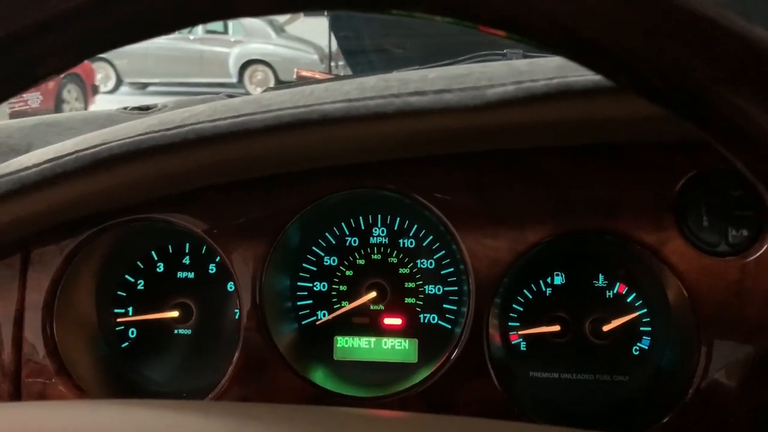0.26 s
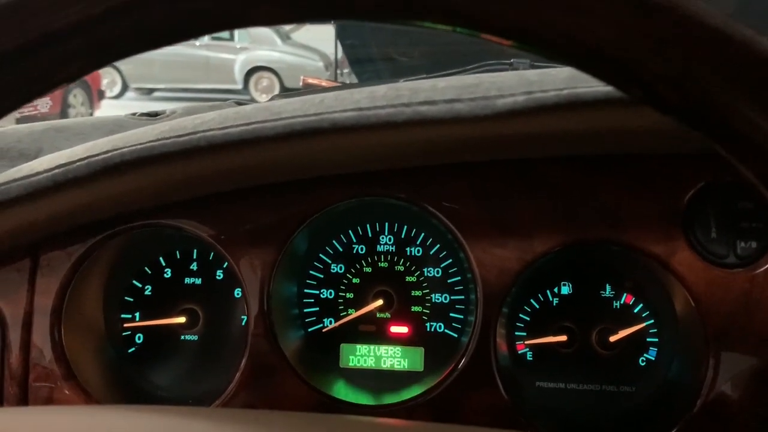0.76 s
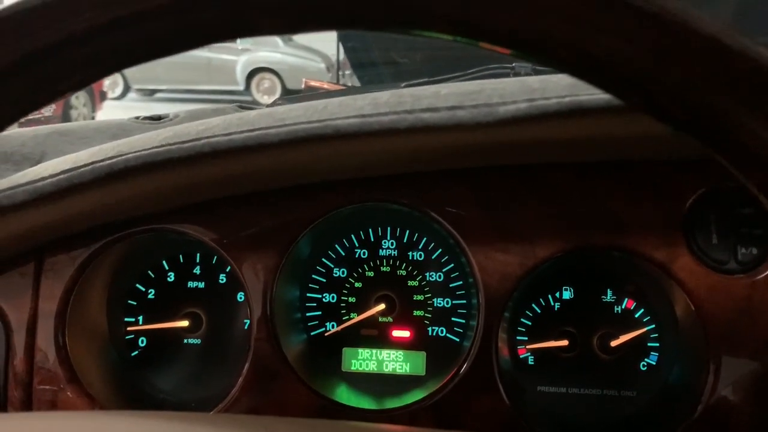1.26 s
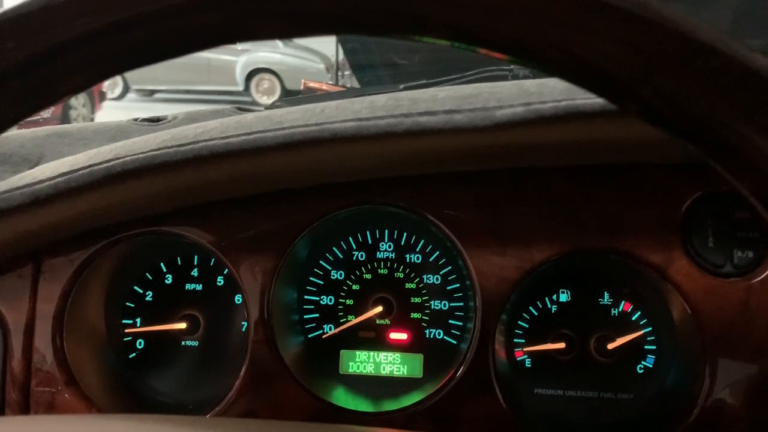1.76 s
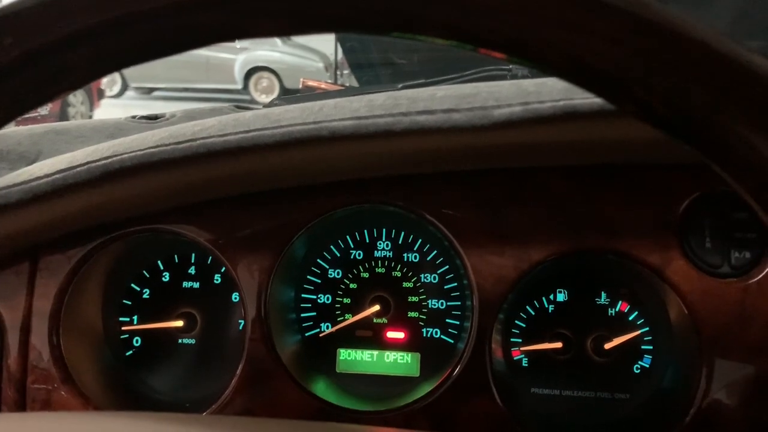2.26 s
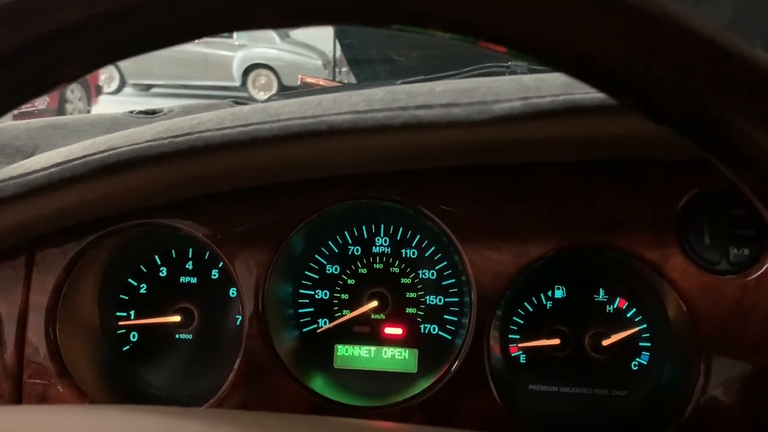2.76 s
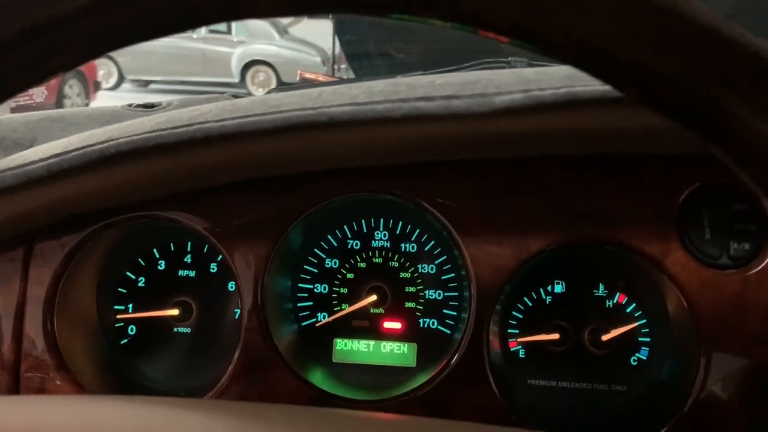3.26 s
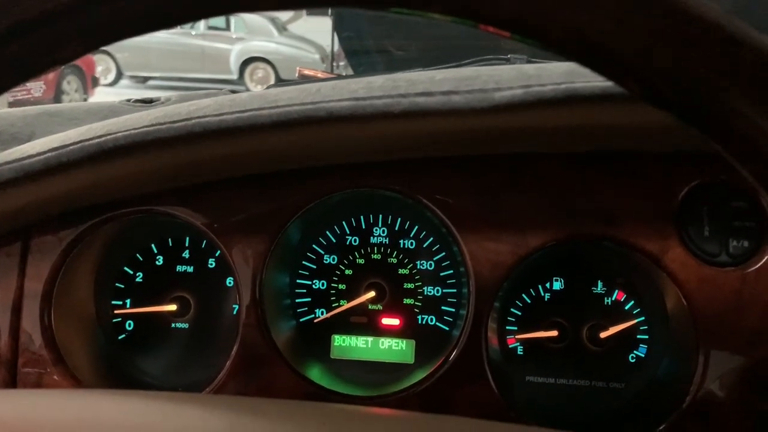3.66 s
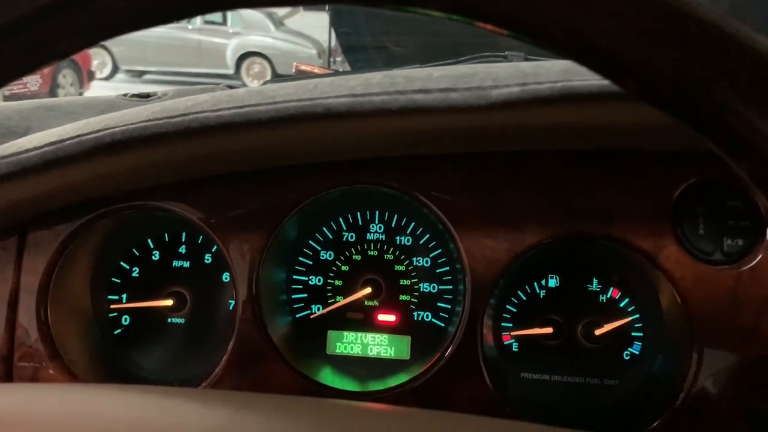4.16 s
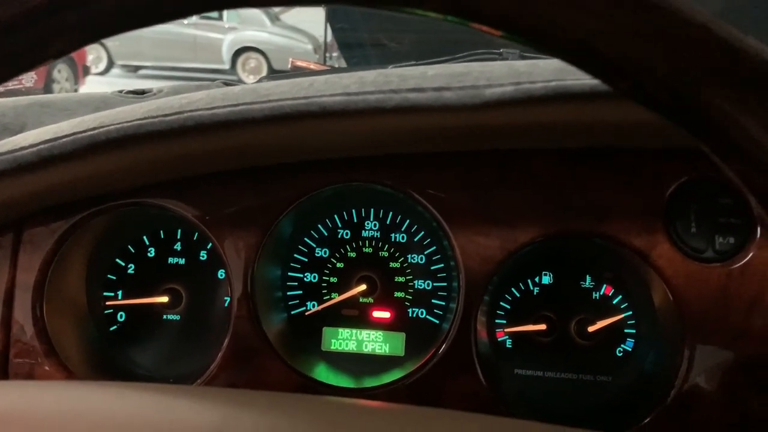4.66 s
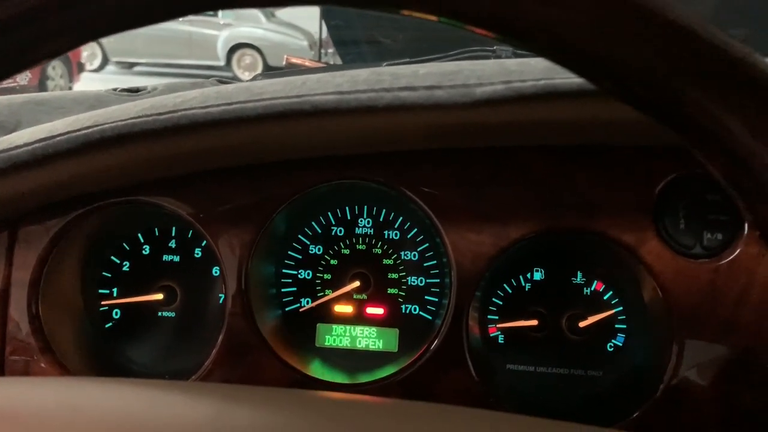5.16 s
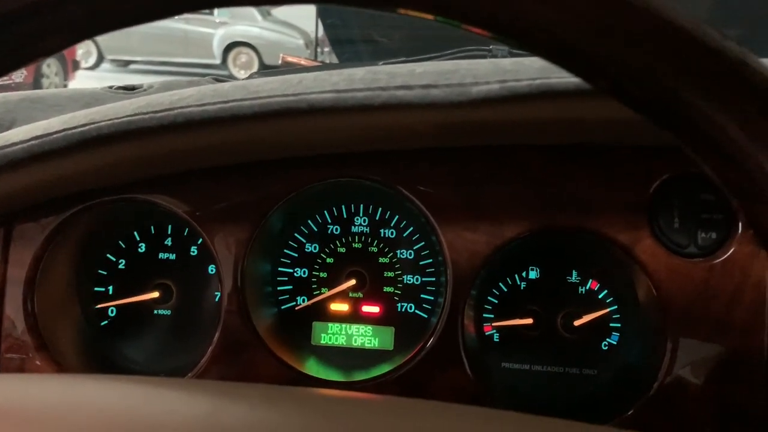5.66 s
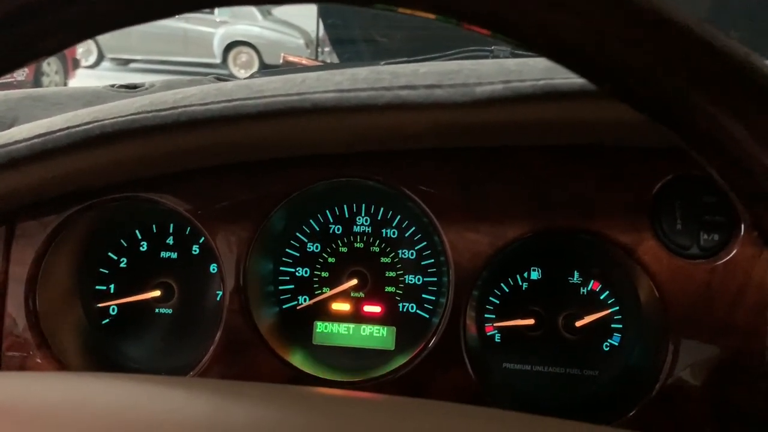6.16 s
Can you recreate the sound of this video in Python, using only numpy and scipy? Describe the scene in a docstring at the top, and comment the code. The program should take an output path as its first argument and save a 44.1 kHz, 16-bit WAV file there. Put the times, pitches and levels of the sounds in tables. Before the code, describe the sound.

From the driver's seat, a smooth booming eight-cylinder idle falls to a slowed, deeper throb, later labouring unevenly with thuds and small trim knocks.

```python
"""An eight-cylinder engine idles at its own pitch, heard from the driver's seat with door and bonnet open in a
workshop. After about a second it drops an octave, as if played at half speed; later it stumbles: its firing
rate sags, then climbs most of the way back, and the cabin boom beats with it. Boom and purr are sines locked
to the firing, rumble, engine bay, fizz and rustles are shaped noise, whines are thin tones, and knocks are
dying sines."""
import sys
import numpy as np
from scipy import signal
from scipy.fft import rfft, irfft
from scipy.io import wavfile
from scipy.ndimage import uniform_filter1d

SR = 44100
rng = np.random.default_rng(int(sys.argv[2]) if len(sys.argv) > 2 else 0)


def inscribe(sig):
    """Save sig as 16-bit PCM at rate SR to the path in sys.argv[1].

    A 1-D sig is mono; a 2-D sig holds one channel per row.
    Samples are clipped to [-1, 1] before scaling.
    """
    pcm = np.round(np.clip(np.atleast_2d(sig).T, -1, 1) * 32767)
    wavfile.write(sys.argv[1], SR, pcm.astype(np.int16))


N = 283122

# Idle at full speed: [t/s, firing rate f/Hz, base level/dB of overtone 2, of overtone 4]
FULL_SPEED_IDLE = [(.1, 42.5, -7.5, -37), (.2, 42.22, -10, -33), (.37, 43.58, -6, -36.5),
                   (.5, 43.92, -6.5, -26.5), (.68, 44.13, -11, -29.5), (.82, 43.98, -8.5, -33.5)]
# Idle and stumble at half speed: [t/s, firing rate f/Hz, firing level/dB, uneven firing level/dB]
HALF_SPEED_IDLE = [(1.15, 21.75, -8, -42.5), (1.75, 21.62, -7, -37.5), (2.05, 21.8, -7.6, -44),
                   (2.35, 21.9, -8.5, -42), (2.7, 21.72, -8, -43.5), (3.3, 21.62, -7, -41.5),
                   (3.85, 21.8, -6.5, -40), (4.2, 21.75, -7.5, -39), (4.5, 21.6, -7.5, -42),
                   (4.8, 21.65, -7, -37), (4.91, 21.5, -5.5, -18), (5.05, 16.7, -2, -7),
                   (5.13, 15.2, -6.5, -7.5), (5.155, 15.3, -5, -21), (5.21, 15.3, -2.5, -16),
                   (5.3, 14.3, -8.5, -19), (5.42, 12.3, -5.5, -16.5), (5.66, 12.5, -7.5, -19),
                   (5.76, 12.1, -8.5, -15), (5.85, 15.3, -19.5, -22), (5.97, 15, -6, -11.5),
                   (6.05, 17.1, -3, -10), (6.17, 18.1, -7.5, -4.5), (6.31, 19.2, -7.5, -4),
                   (6.4, 20, -6.5, -2.5)]
# Cross-fade from full to half speed: [start t/s, end t/s]
SPEED_CHANGE = (0.901, 1.04)
# Noise of the shaking body, at half speed: [f/Hz, relative level/dB]
RUMBLE_SHAPE = [(30, -39.5), (52, -17), (75, -16), (110, -14), (170, -19.5), (240, -19), (262, -13),
                (276, -24.5), (345, -27), (375, -34.5), (420, -33.5), (520, -38.5), (570, -47), (800, -69)]
# Noise of belts, fan and valve gear, at half speed: [f/Hz, relative level/dB per Hz]
BAY_SHAPE = [(260, -28.5), (450, -3.5), (534, -2.5), (567, -11.5), (770, -7.5), (1030, -10.5), (1200, -8.5),
             (1700, -13.5), (3530, -19.5), (4850, -19), (5690, -22.5), (6910, -23), (8300, -43),
             (10800, -73), (18300, -120)]
# Ringing parts that colour both noises, at half speed: [f/Hz, width/Hz, boost level/dB]
RINGING_PANELS = [(204, 16, 7), (330, 16, 4), (410, 16, 3.5), (752, 50, 5), (1155, 60, 3), (1700, 200, 4),
                  (2302, 40, 3), (2500, 250, 2), (2658, 30, 4), (3300, 150, 3), (3883, 40, 9),
                  (4031, 50, 7), (4285, 60, 4), (4680, 90, 4), (4788, 80, 6.5), (5240, 50, 4)]
# How alike the noise is left and right, at half speed: [f/Hz, likeness 0-1]
LEFT_RIGHT_LIKENESS = [(60, 0.89), (250, 0.96), (450, 0.6), (750, 0.7), (950, 0.95), (1500, 0.17),
                       (2500, 0.3), (3300, 0.02), (4600, 0.7), (6500, 0)]
# Noise balance, at half speed: [f/Hz, left minus right level/dB]
LEFT_RIGHT_TILT = [(60, 0.5), (180, 1.5), (550, 0.5), (1650, 2.5), (4970, -2.5), (15000, 0.5)]
# Faint top hiss: [f/Hz, relative level/dB per Hz]
FIZZ_SHAPE = [(4590, -28), (7800, -8.5), (8630, -22.5), (10500, 9.5), (12000, 2.5), (12600, -16),
              (13300, -27), (14300, -6), (15600, 0.5)]
# Short rustles: [t/s, base level/dB, fading time constant/s]
RUSTLE_EVENTS = [(1.67, -35, 0.042), (1.76, -40, 0.028), (2.8044, -48, 0.031), (2.824, -38.5, 0.025),
                 (2.85, -45, 0.026), (2.894, -41, 0.027), (2.923, -55, 0.03)]
# Colour of the rustles: [f/Hz, relative level/dB per Hz]
RUSTLE_SHAPE = [(1470, -30), (2500, 1.5), (4790, -2.5), (7020, -7.5), (8310, -23), (10300, -5.5),
                (12500, -19), (13300, -19), (15000, -11), (15600, -14)]
# Trim knocks: [t/s, base level/dB]
TRIM_KNOCKS = [(6.276, -20), (6.395, -12.5), (6.408, -11)]
# Ways the trim rings: [f/Hz, relative level/dB, time to fall 60 dB/s]
TRIM_MODES = [(515, 0, .035), (1090, -4, .028), (1380, -17, .04), (1700, -19, .026)]
# Weak lines from unequal cylinders: [multiple of the crank turns per second]
PURR_MULTIPLES = (5, 6, 7, 10, 11, 13, 14, 15, 19, 21, 24, 25, 28, 29, 30, 31, 32, 35, 37, 38, 39, 40, 41,
                  42, 43, 45, 48, 53, 57, 60, 61, 72, 76)
# One base level for each of those lines: [level/dB]
PURR_LEVELS = (-54, -46, -39, -44, -35, -46, -44, -43, -48, -48, -36, -47, -36, -44, -44, -49, -38, -44,
               -40, -38, -48, -47, -42, -45, -43, -44, -44, -55, -57, -49, -57, -57, -48)
# Main overtones: [multiple of the firing rate]
BOOM_MULTIPLES = (2, 4)
# Uneven-firing overtones: [multiple of the firing rate]
LUMP_MULTIPLES = (3, 5, 6)
# One for each of those, over the uneven firing: [level/dB]
LUMP_LEVELS = (0, -3, -2)
# How the low overtones reach the seat: [f/Hz, level/dB]
PASSAGE_TO_SEAT = [(24, -41), (29, -20), (33, -11), (37, -5.5), (43.5, 0), (50, -6), (60, -12.5),
                   (75, -15.5), (90, -17.5), (130, -22.5)]
# Overtone 4 over the firing strength: [t/s, level/dB]
OVERTONE_4_LEVEL = [(1.2, -3.5), (1.8, -3.5), (2.6, -5.5), (3.7, -9), (4.3, -8.5), (4.9, -5)]
# A short knock, then body shudders: [t/s, base level/dB, f/Hz, upper mode level/dB, cycles of f to fall 60 dB]
KNOCK_AND_SHUDDERS = [(.9556, 0, 1060, -30, 8), (5.734, 0, 225, -20, 7.5), (5.872, 13, 108, -6, 4.5),
                      (5.8985, 13.5, 90, -9, 4.2)]
# Thin steady tones, perhaps pumps and fans, at half speed: [f/Hz, base level/dB]
WHINE_TONES = [(353, -59), (366, -58), (492, -61), (525, -62), (603, -68), (658, -68), (674, -63),
               (728, -64), (758, -62), (794, -66), (841, -68), (899, -66), (986, -69), (1058, -66),
               (1156, -66)]

FAST, SLOW = 2, 1  # playing speeds, as factors on the half-speed frequencies
FIRINGS_PER_TURN = 4
LUMP_LAG = 0.32  # turns of phase by which overtones trail, per step in multiple
LEAD_S, LEAD_FROM_HZ = 0.000465, 152  # at half speed, the noise reaches the left microphone first above this
CABIN_HZ, CABIN_WIDTH_HZ = 43.3, 5  # the air in the cabin booms here
FULL_RUMBLE_DB, FULL_BAY_DB = -28.5, -41
HALF_RUMBLE_DB, HALF_BAY_DB = -29.5, -41  # before the stumble
SINK_DB_PER_OCTAVE = 3  # bay noise and fizz sink with the firing rate
FIZZ_DB = -67  # before the stumble
JUMP_S, JUMP_DB = 0.925, -2.5
EDGE_HZ = 15900  # top of the final sound


def amp(db):
    """Turn decibels into a factor."""
    return 10 ** (np.asarray(db) / 20)


def evened(x):
    """Scale to an rms of 1."""
    return x / np.sqrt(np.mean(x ** 2) + 1e-20)


def read(points, hz):
    """Read a curve between its points, on a logarithmic frequency scale."""
    f, value = np.transpose(points)
    return np.interp(np.log(hz + 1), np.log(f + 1), value)


def columns(rows):
    """Spread each column after the time over every sample."""
    s, *values = np.transpose(rows)
    return [np.interp(np.arange(N) / SR, s, v) for v in values]


def add(mix, s, sound):
    """Add a sound to the mix from second s, cut at the end."""
    part = mix[round(s * SR):][:len(sound)]
    part += sound[:len(part)]


def sides(left_db):
    """Raise the left by this many dB and lower the right by as much."""
    return amp(left_db * np.array([[1], [-1]]))


def wander(per_s):
    """Slow random drift of rms 1: twenty sines, the fastest with per_s cycles a second."""
    t = np.arange(0, N + 256, 256) / SR
    speeds = np.geomspace(per_s / 10, per_s, 20)
    slow = sum(np.sin(2 * np.pi * (f * t + rng.random())) / np.sqrt(f) for f in speeds)
    return np.interp(np.arange(N) / SR, t, evened(slow))


def shaped(spectrum):
    """Noise of rms 1 coloured by a curve."""
    hz = np.fft.rfftfreq(N, 1 / SR)
    return evened(irfft(rfft(rng.standard_normal(N)) * amp(read(spectrum, hz)), N))


def overtones(firing_hz, multiples, levels_db, uneven_db, lag=0):
    """Sines locked to the firing; uneven firing makes each waver, the pipes delay the higher ones."""
    turns = np.cumsum(firing_hz) / SR
    out = np.zeros(N)
    for k, db in zip(multiples, levels_db):
        waver_db = uneven_db * wander(12.0)
        pipe_delay = k * k / 4 + 2 * np.pi * lag * (k - BOOM_MULTIPLES[1])
        angle = 2 * np.pi * k * turns - pipe_delay + waver_db / 4  # stronger firings come earlier
        out += amp(db + waver_db) * np.sqrt(2) * np.cos(angle)
    return out


def noise(spectrum, pace, patchy_db, size):
    """Stereo noise of rms 1 ringing in the panels; pace 2 moves every frequency up an octave."""
    hop = size // 4
    frames = N // hop + 5
    hz = np.fft.rfftfreq(size, 1 / SR) / pace
    a, b, c, d, patches = rng.standard_normal((frames, len(hz), 5)).T
    # Smooth the patches over frequency, then over time
    patches = uniform_filter1d(patches, size=9, axis=0)
    patches = evened(uniform_filter1d(patches, size=5, axis=1))
    rings_db = sum(db / (1 + (2 * (hz - f) / width) ** 2) for f, width, db in RINGING_PANELS)
    # Echoes from the walls ripple the spectrum finely
    ripple = rng.standard_normal((2, len(hz)))
    echoes_db = 2.1 * evened(ripple - uniform_filter1d(ripple, size=5))[..., None]
    # The right side is partly a late copy of the left, partly its own noise
    same = np.clip(read(LEFT_RIGHT_LIKENESS, hz), 0, 1)[:, None]
    late = np.exp(-2j * np.pi * LEAD_S * np.maximum(hz - LEAD_FROM_HZ, 0))[:, None]
    left = a + 1j * b
    right = same * late * left + np.sqrt(1 - same ** 2) * (c + 1j * d)
    tilt = amp(read(LEFT_RIGHT_TILT, hz) / 2)[:, None]
    colour_db = (read(spectrum, hz) + rings_db)[:, None]
    z = np.array([left * tilt, right / tilt]) * amp(colour_db + patchy_db * patches + echoes_db)
    out = signal.istft(z, nperseg=size, noverlap=size - hop)[1][:, :N]
    return out / np.sqrt(np.mean(out.mean(0) ** 2))


def purr(firing_hz, waver_db):
    """Each cylinder fires a little differently, so weak sines stand on multiples of the crank turn."""
    turns = np.cumsum(firing_hz) / SR / FIRINGS_PER_TURN
    turns = turns + 0.0012 * wander(5.5)  # the crank speed trembles
    out = np.zeros((2, N))
    for k, db in zip(PURR_MULTIPLES, PURR_LEVELS):
        wave = np.cos(2 * np.pi * (k * turns + rng.random()))  # starts at a random angle
        line = amp(db + waver_db * wander(8.6)) * np.sqrt(2) * wave
        out += sides(rng.uniform(-2.4, 2.9)) * line
    return out


def whines(pace):
    """Thin tones that waver a little in level and pitch."""
    t = np.arange(N) / SR
    out = np.zeros((2, N))
    for hz, db in WHINE_TONES:
        angle = 2 * np.pi * (pace * hz * t + rng.random()) + 0.6 * wander(5.0)
        tone = amp(db + 2.5 * wander(4.0)) * np.sqrt(2) * np.cos(angle)
        out += sides(rng.uniform(-1, 2.8)) * tone
    return out


def full_speed():
    """The idle at its own pitch: boom, body rumble, engine bay, purr and whines."""
    hz, boom_db, octave_db = columns(FULL_SPEED_IDLE)
    boom = overtones(hz, BOOM_MULTIPLES, [boom_db, octave_db], 0.59) * sides(-0.75)
    rumble = amp(FULL_RUMBLE_DB) * noise(RUMBLE_SHAPE, FAST, 1.0, size=2048)
    bay = amp(FULL_BAY_DB) * noise(BAY_SHAPE, FAST, 1.4, size=2048)
    cylinders = purr(uniform_filter1d(hz, size=SR), 1.9)  # these lines drift less than the boom
    return boom + rumble + bay + cylinders + amp(-3.5) * whines(FAST)


def cabin(x):
    """The cabin air is a resonator that rings on for a moment when the engine note leaves its pitch."""
    turn = np.exp(2j * np.pi * CABIN_HZ * np.arange(N) / SR)
    r = np.exp(-np.pi * CABIN_WIDTH_HZ / SR)
    # Shift the cabin pitch down to zero, smooth, and shift back up
    smooth = signal.lfilter([1 - r], [1, -r], x / turn)
    ringing = 2 * (turn * smooth).real
    return 0.4 * x + 0.6 * ringing


def sink_db(hz):
    """Level lost as the firing rate falls below its starting rate."""
    return SINK_DB_PER_OCTAVE * np.log2(hz / hz[0])


def half_speed():
    """The idle an octave down, then the stumble: the overtones slide through the cabin boom."""
    hz, firing_db, uneven_db = columns(HALF_SPEED_IDLE)
    sag = np.maximum(hz[0] / hz - 1, 0)  # grows as the engine slows
    low, high = BOOM_MULTIPLES
    low_db = firing_db + read(PASSAGE_TO_SEAT, low * hz)
    high_db = firing_db + columns(OVERTONE_4_LEVEL)[0] + read(PASSAGE_TO_SEAT, high * hz)
    # With sag the lower overtone wavers more, the higher one less
    boom = cabin(overtones(hz, [low], [low_db], 0.19 + 0.8 * sag))
    boom -= overtones(hz, [high], [high_db], 0.8 - 0.5 * sag)  # above the boom it swings the other way
    lumps_db = [uneven_db + db + read(PASSAGE_TO_SEAT, k * hz) for k, db in zip(LUMP_MULTIPLES, LUMP_LEVELS)]
    lumps = overtones(hz, LUMP_MULTIPLES, lumps_db, 0.59 + 0.3 * sag, LUMP_LAG)
    # The shaking body rumbles more as the engine labours, while purr, bay and whines weaken
    rumble = amp(HALF_RUMBLE_DB + 2.5 * sag) * noise(RUMBLE_SHAPE, SLOW, 0.98, size=4096)
    cylinders = amp(0.94 - 6.3 * sag) * purr(hz, 1.1)
    bay = amp(HALF_BAY_DB + sink_db(hz)) * noise(BAY_SHAPE, SLOW, 1.56, size=2048)
    tones = amp(-0.3 - 4.5 * sag) * whines(SLOW)
    return (boom + lumps) * sides(-0.75) + rumble + cylinders + bay + tones


def fizz():
    """Faint top hiss that flickers and sinks with the engine."""
    hz = columns(HALF_SPEED_IDLE)[0]
    return amp(FIZZ_DB + sink_db(hz) + 1.6 * wander(30.0)) * shaped(FIZZ_SHAPE)


def wave_jump():
    """The wave jumps down once as the speed starts to change, and eases back in milliseconds."""
    out, t = np.zeros(N), np.arange(SR // 4) / SR
    add(out, JUMP_S, -amp(JUMP_DB) * np.exp(-t / 0.0024))
    return out


def struck(db, modes):
    """A struck part: dying sines with a soft start set by the first mode."""
    t = np.arange(SR // 4) / SR
    rings = sum(amp(d - 60 * t / t60) * np.sin(2 * np.pi * f * t) for f, d, t60 in modes)
    onset = (1 - np.exp(-t * modes[0][0] * 1.2)) ** 2
    return amp(db) * onset * rings


def knock_and_shudders():
    """The knock and the body shudders each ring at a main pitch with a weaker mode below and above it."""
    out = np.zeros(N)
    for s, db, hz, upper_db, cycles in KNOCK_AND_SHUDDERS:
        t60 = cycles / hz
        modes = [(hz, 0, t60), (0.8 * hz, -16, t60), (1.45 * hz, upper_db, t60)]
        add(out, s, struck(db, modes))
    return out


def rustles():
    """Grainy bursts of treble noise that start quickly and fade."""
    swell = np.zeros(N)
    for s, db, fade_s in RUSTLE_EVENTS:
        u = np.arange(0, 6, 1 / (fade_s * SR))  # time in fading times
        add(swell, s, amp(db - 5.0) * (1 - np.exp(-u * 4.6)) * np.exp(-u))
    grain = amp(3.1 * evened(uniform_filter1d(rng.standard_normal(N), size=45)))
    return swell * grain * shaped(RUSTLE_SHAPE)


def trim_knocks():
    """Knocks on the trim set its modes ringing briefly."""
    out = np.zeros(N)
    for s, db in TRIM_KNOCKS:
        add(out, s, struck(db, TRIM_MODES))
    return out


def scene():
    """Cross-fade the two speeds and add the knocks on top."""
    start, end = SPEED_CHANGE
    slow = np.clip((np.arange(N) / SR - start) / (end - start), 0, 1)
    treble = (fizz() + rustles()) * sides(-0.6)
    before = (1 - slow) ** 1.15 * full_speed()
    after = slow ** 1.58 * (half_speed() + treble)
    return before + after + wave_jump() + knock_and_shudders() + trim_knocks()


def record(dry):
    """Round off the loudest peaks, then cut everything above the top edge."""
    over = np.maximum(abs(dry) - 0.75, 0)
    rounded = dry - np.sign(dry) * (over - 0.2 * np.tanh(over / 0.2))
    low_pass = signal.firwin(511, EDGE_HZ, window=("kaiser", 9), fs=SR)
    return signal.oaconvolve(rounded, low_pass[None], "same")


dry = scene()
out = record(dry)
inscribe(out)
```